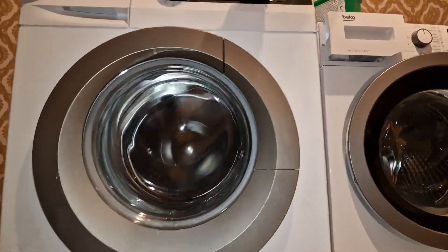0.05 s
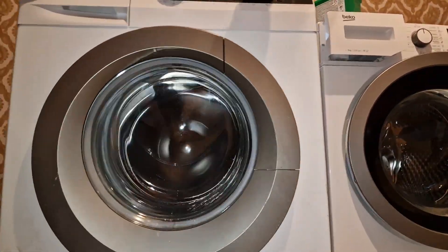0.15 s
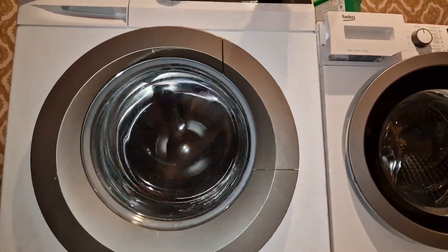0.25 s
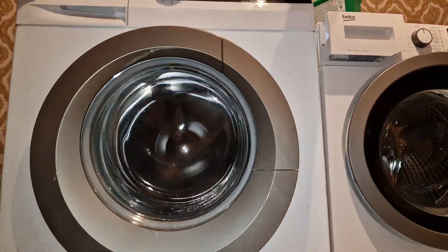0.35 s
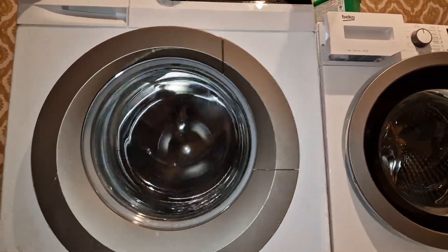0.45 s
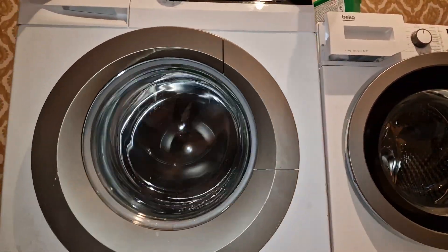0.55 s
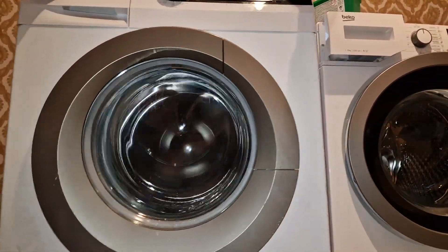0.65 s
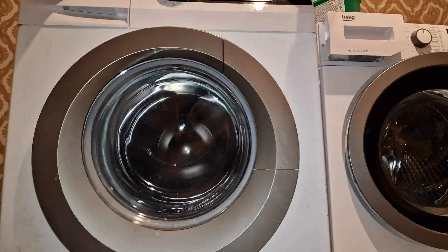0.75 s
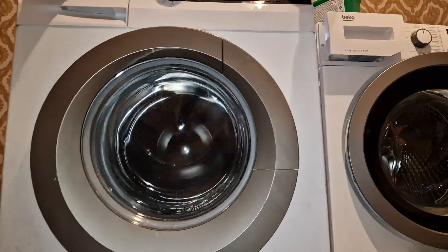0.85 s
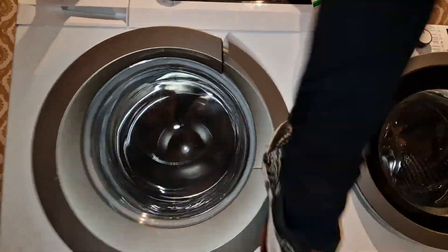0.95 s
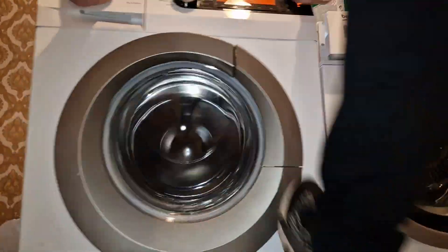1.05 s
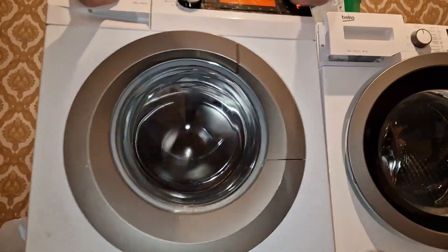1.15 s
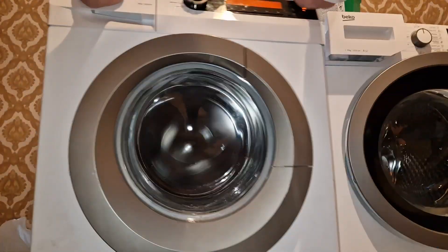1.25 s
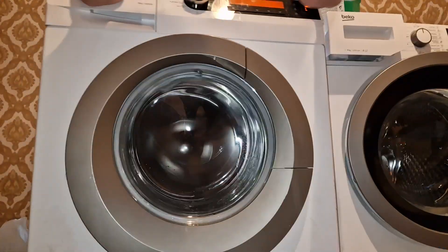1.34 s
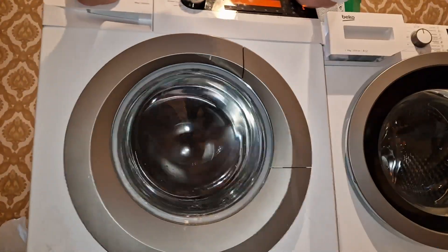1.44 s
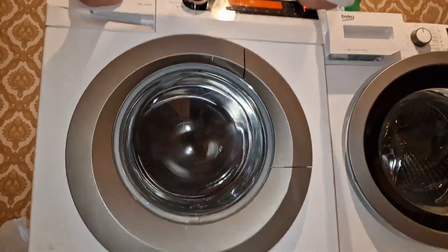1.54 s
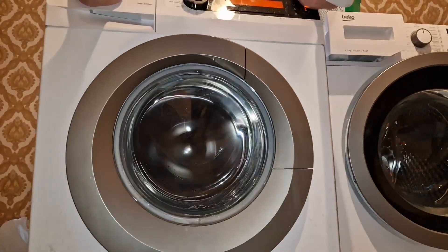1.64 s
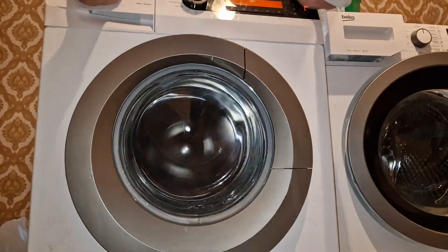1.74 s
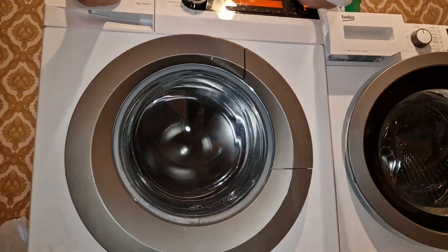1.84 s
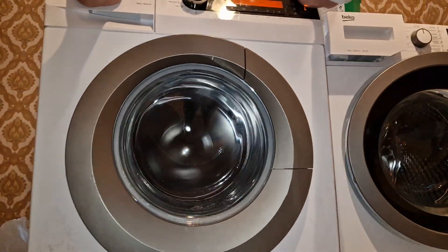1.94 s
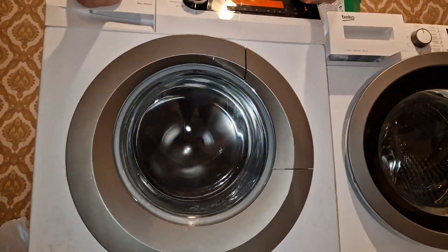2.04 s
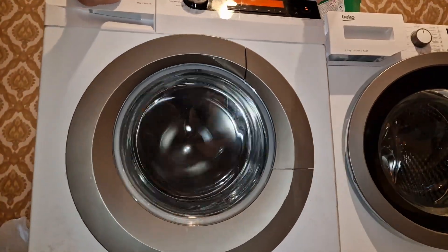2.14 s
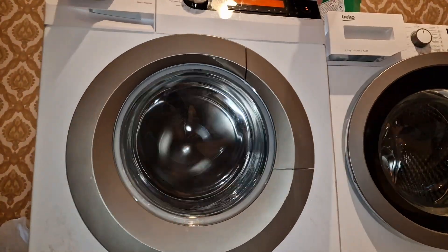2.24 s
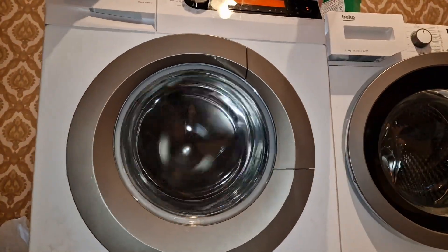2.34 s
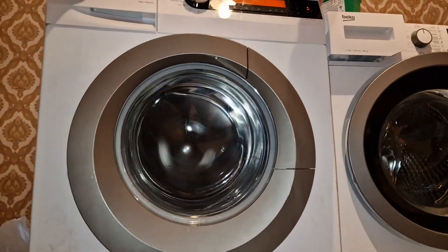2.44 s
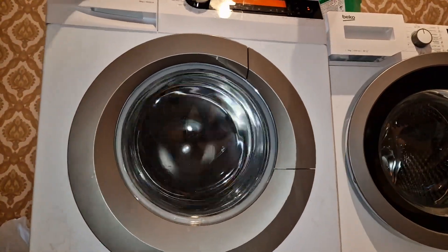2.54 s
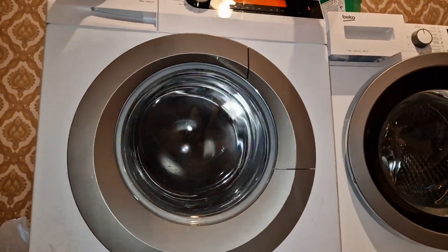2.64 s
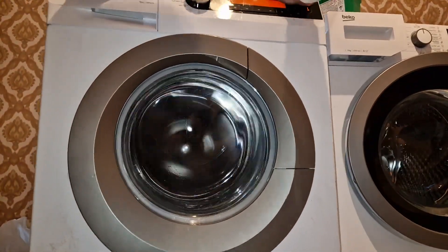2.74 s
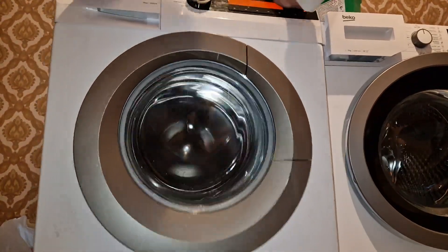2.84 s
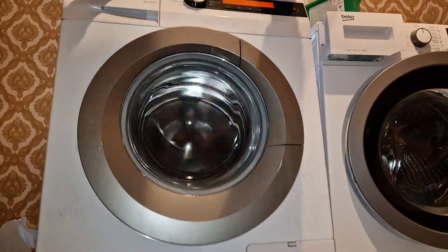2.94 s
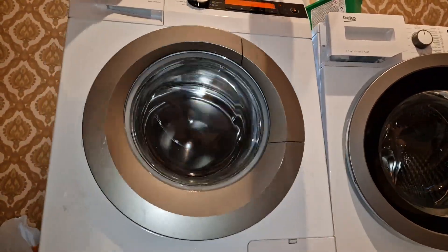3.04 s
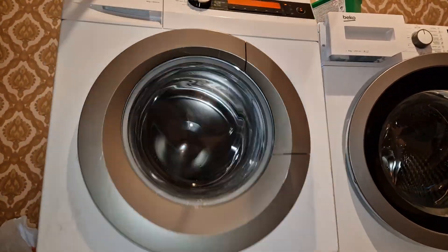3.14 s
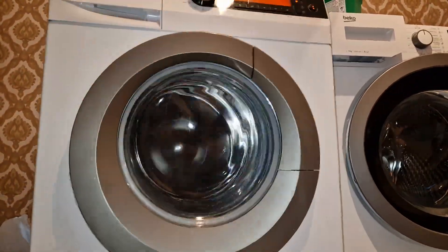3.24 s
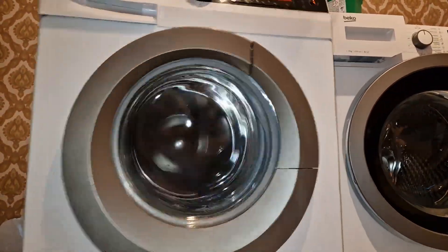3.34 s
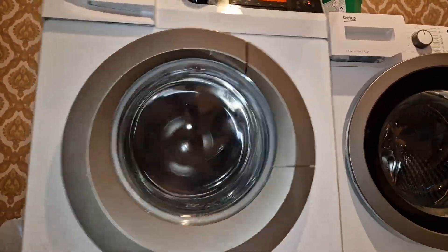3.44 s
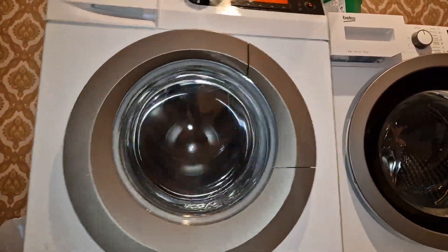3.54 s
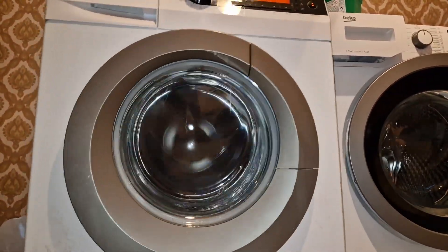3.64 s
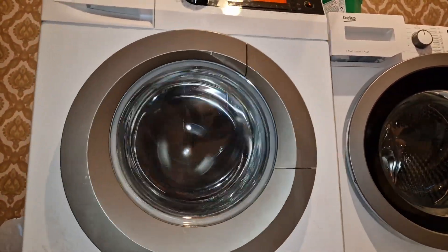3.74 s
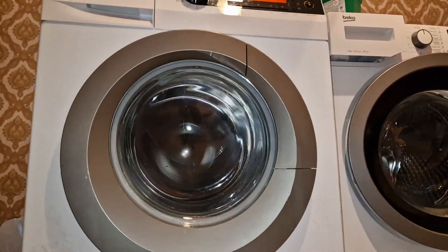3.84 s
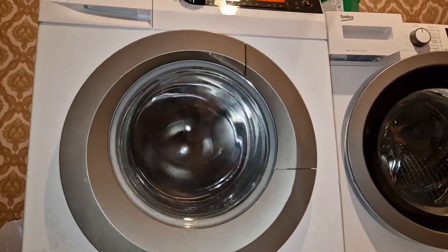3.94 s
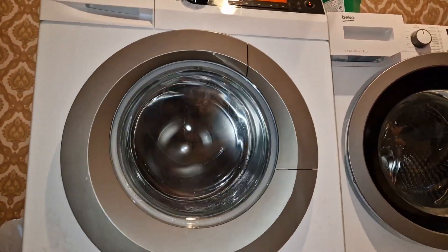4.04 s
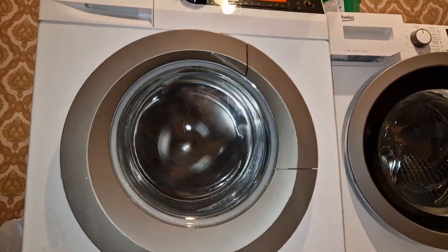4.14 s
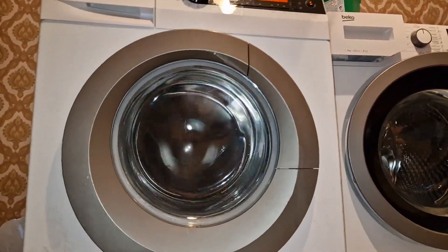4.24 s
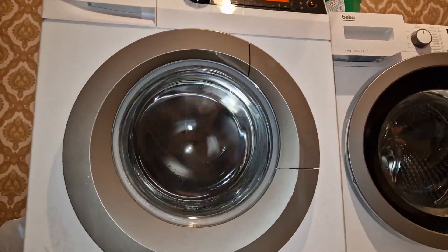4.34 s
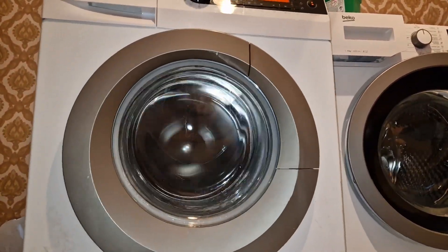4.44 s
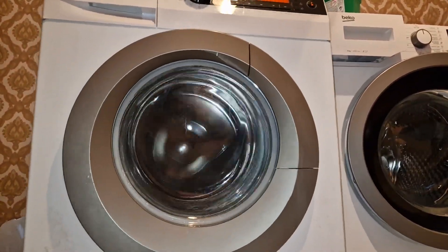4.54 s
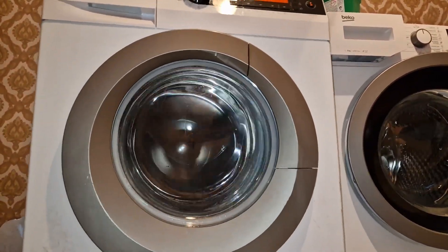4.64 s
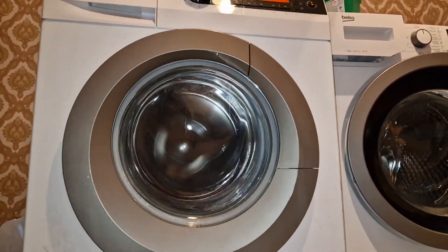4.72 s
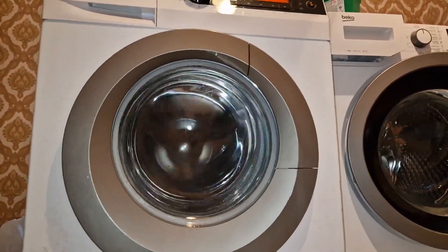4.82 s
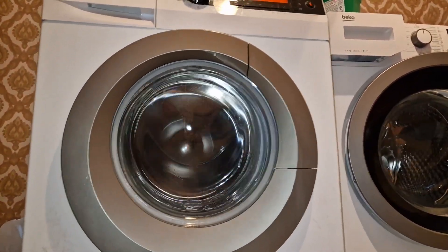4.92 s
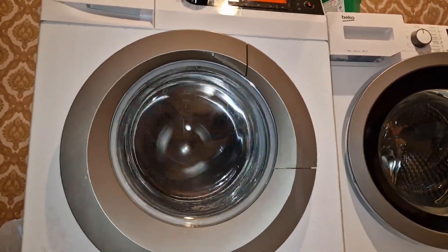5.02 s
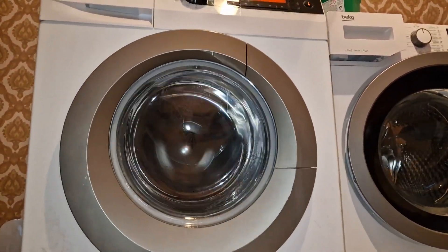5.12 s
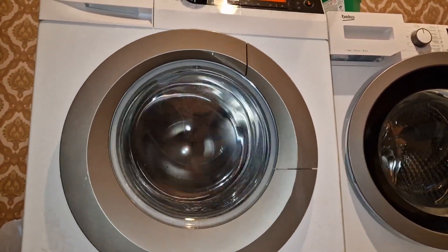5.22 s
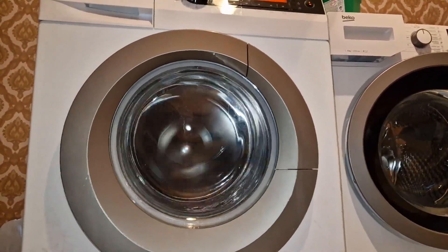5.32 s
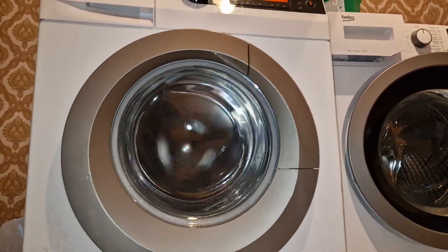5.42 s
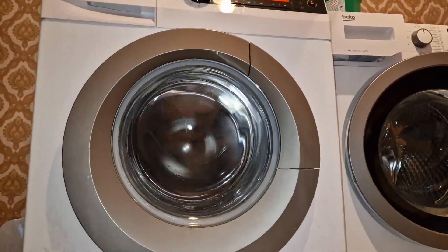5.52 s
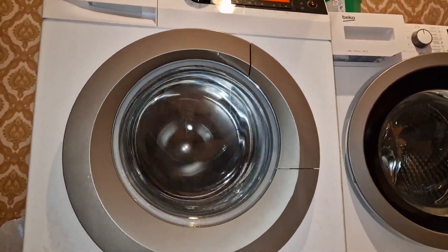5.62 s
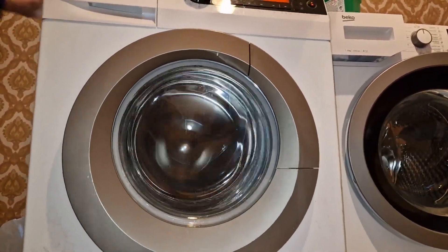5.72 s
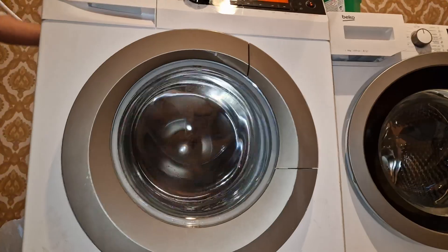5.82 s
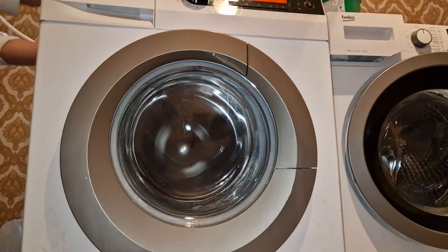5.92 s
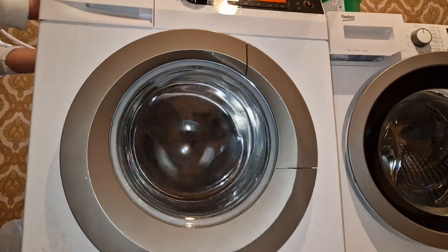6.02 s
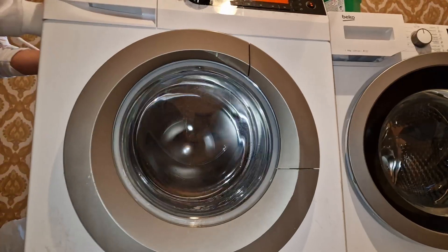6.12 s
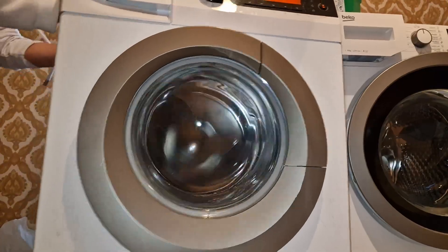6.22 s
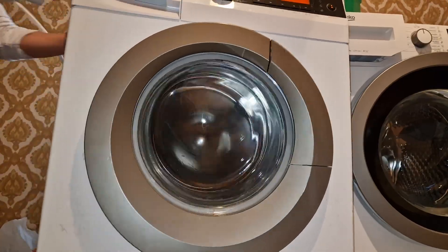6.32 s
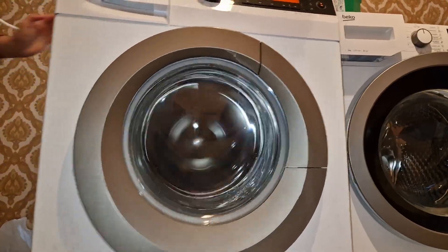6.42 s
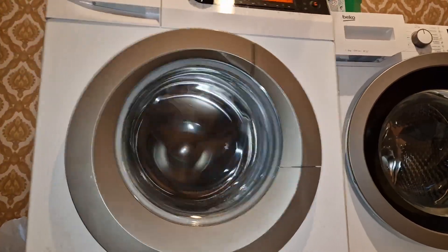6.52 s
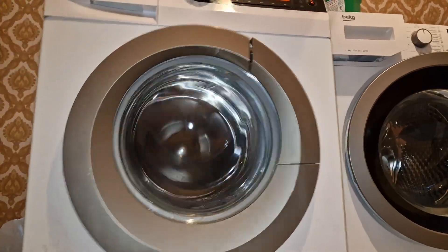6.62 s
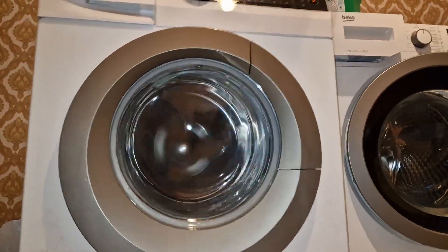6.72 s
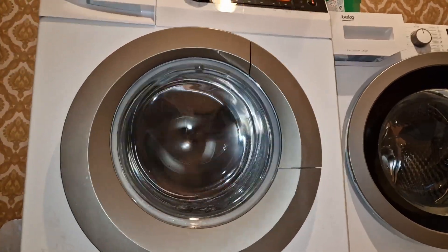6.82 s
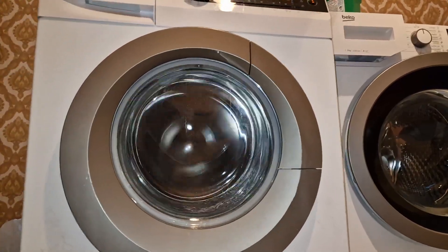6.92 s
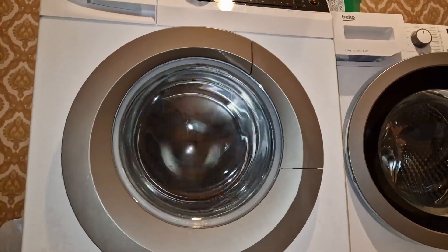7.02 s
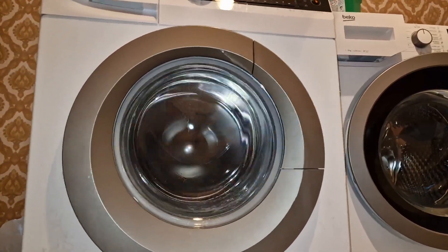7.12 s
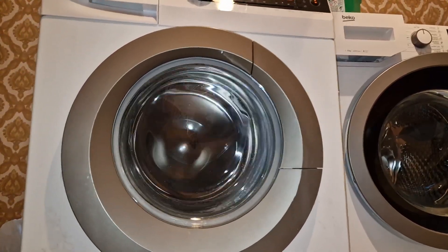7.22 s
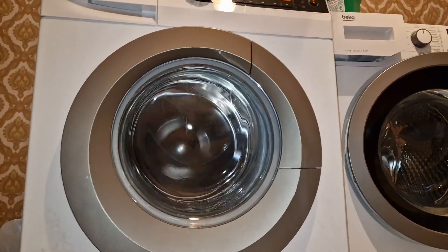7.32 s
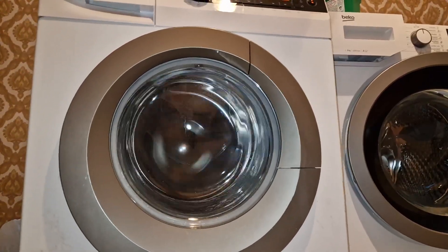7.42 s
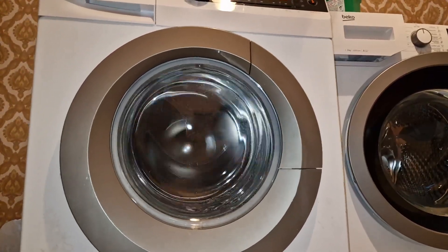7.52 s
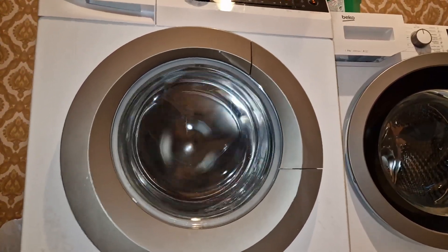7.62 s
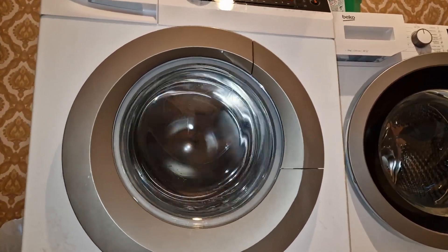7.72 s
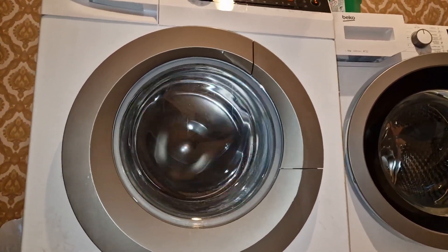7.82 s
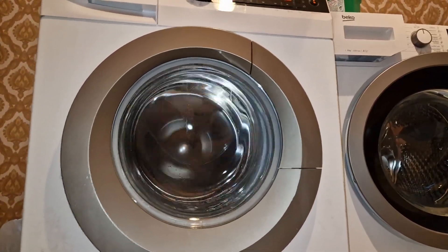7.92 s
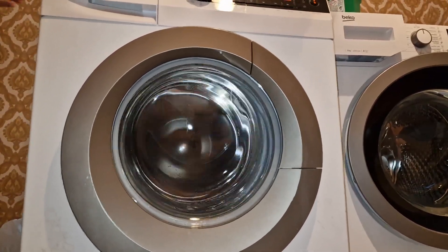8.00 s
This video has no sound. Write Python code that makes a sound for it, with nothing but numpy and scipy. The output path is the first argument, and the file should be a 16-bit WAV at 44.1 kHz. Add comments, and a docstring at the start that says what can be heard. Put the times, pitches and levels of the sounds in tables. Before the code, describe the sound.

A washing machine spins an unbalanced load fast, its heavy low drone throbbing and ticking, broken by three violent volleys of metallic bangs.

```python
"""A front-loading washing machine, nearer the left microphone in a small hard-walled room, spins an unbalanced
load. At ten to twelve turns a second, periodic jolts and irregular rocking drive cabinet modes into a heavy
drone. Shaped noise makes the churning tub, hissing bearing, chafing seal, ticking fittings and light metal
clinks. As the imbalance builds up, the machine lurches three times: it sways, bangs in volleys and judders on
its feet. Blows are noise bursts with ringing panels; each lurch resettles the load."""
import sys
import numpy as np
from scipy import signal
from scipy.fft import rfft, irfft, next_fast_len
from scipy.io import wavfile
from scipy.ndimage import uniform_filter1d, map_coordinates

SR = 44100
rng = np.random.default_rng(int(sys.argv[2]) if len(sys.argv) > 2 else 0)


def store_wav(level_fs):
    """Save 16-bit WAV to argv[1]."""
    pcm = np.round(np.clip(np.atleast_2d(level_fs), -1, 1) * 32767)
    wavfile.write(sys.argv[1], SR, pcm.T.astype(np.int16))


N = 355446
TIME = np.arange(N) / SR


def amp(db):
    """Convert decibels to gain."""
    return np.exp(np.asarray(db) * (np.log(10) / 20))


def unit(x):
    """Scale to rms 1."""
    return x / np.sqrt(np.mean(x ** 2) + 1e-20)


def along(points, hz):
    """Read (frequency [Hz], value) points on a logarithmic frequency axis."""
    frequency, value = np.transpose(points)
    return np.interp(np.log(hz + 1), np.log(frequency + 1), value)


def curves(rows):
    """Give one value per sample for each column after the time."""
    s, *columns = np.transpose(rows)
    return [np.interp(TIME, s, column) for column in columns]


def wobble(rate):
    """A smooth random curve with rate knots a second."""
    return map_coordinates(rng.standard_normal(4096), [TIME * rate], mode="wrap")


def filtered(x, response):
    """Multiply the spectrum of x by a complex response of frequency."""
    m = next_fast_len(N + SR // 2, True)
    return irfft(rfft(x, m) * response(np.fft.rfftfreq(m, 1 / SR)), m)[..., :N]


# likeness of the two microphones: (frequency [Hz], correlation [-1 to 1])
MICROPHONE_LIKENESS = [(60, .99), (130, 0.99), (290, 0.93), (640, 0.89), (1400, 0.45), (3100, 0.083),
                       (12000, 0.016)]
LEFT_LEADS_S = .00018  # the machine stands nearer the left microphone


def spread(pair, gain=lambda hz: 1):
    """Two unrelated signals, coloured by gain, become left and right: alike in the bass, the left a little early."""
    m = next_fast_len(N + 8192, True)
    hz = np.fft.rfftfreq(m, 1 / SR)
    alike = np.clip(along(MICROPHONE_LIKENESS, hz), -1, 1)
    shares = np.sqrt([(1 + alike) / 2, (1 - alike) / 2])
    mid, side = rfft(pair, m) * (gain(hz) * shares)
    late = np.exp(-2j * np.pi * hz * LEFT_LEADS_S)
    return irfft(np.array([mid + side, (mid - side) * late]), m)[:, :N]


def noise(spectrum):
    """Stereo noise of rms 1 with the given colour."""
    white = rng.standard_normal((2, N))
    return unit(spread(white, lambda hz: amp(along(spectrum, hz))))


def blows(times, db):
    """One impulse for each contact."""
    samples = np.clip(np.asarray(times) * SR, 0, N).astype(int)
    return np.bincount(samples, amp(db), N + 1)[:N]


def bursts(times, db, attack, t60):
    """Envelope of contacts that rise over attack seconds and fall 60 dB in t60 seconds."""
    t = TIME[:SR // 2]
    shape = (1 - np.exp(-t / attack)) * amp(-60 * t / t60)
    return signal.oaconvolve(blows(times, db), shape)[:N]


# decay of the small room: (frequency [Hz], t60 [s])
ROOM_DECAY = [(200, 0.71), (1000, 0.22), (4000, 0.29), (9000, 0.26), (16000, 0.29)]


def in_room(x, wet_db):
    """The sound plus the tail of a small hard-walled room, drawn afresh for successive stretches."""
    count = 9  # stretches, each with its own random tail
    grains = rng.standard_normal((count, 2, SR // 2))
    hz, t, z = signal.stft(grains, SR, nperseg=256)
    decay = amp(-60 * t / along(ROOM_DECAY, hz)[:, None]) * (1 - np.exp(-t / 0.00093))
    tails = signal.istft(z * decay, SR, nperseg=256)[1]
    echo = np.zeros((2, N + SR))
    for part, tail in zip(np.array_split(np.arange(N), count), tails):
        answer = signal.fftconvolve(x[:, part], tail / np.linalg.norm(tail[0]), axes=1)
        echo[:, part[0]:part[0] + answer.shape[1]] += answer
    return x + amp(wet_db) * spread(echo[:, :N])


# speed of the drum: (time [s], speed [turns/s])
DRUM_SPEED = [(0, 10.03), (1.4, 9.96), (2.4, 10.39), (3, 10.62), (3.6, 10.41), (4.2, 10.97), (4.8, 10.79),
              (5.6, 11.16), (6.4, 11.31), (7.2, 11.43), (8.06, 11.74)]


def drum_turns():
    """The drum's angle, counted in turns, is its speed summed over time."""
    return .25 + np.cumsum(curves(DRUM_SPEED)[0]) / SR


# growth of the imbalance, before its cap and smoothing: (start time [s], imbalance [dB], growth [dB/s])
LOAD_BUILDUPS = [(0, -4, 1.5), (1.7, -4, 4.5), (3.8, -2, 4), (6.87, -1.84, 4)]
MOST_IMBALANCE_DB, RESETTLE_S = 4.5, 0.21


def imbalance():
    """How far off centre the load sits, in dB: it creeps up to a limit and drops back after each lurch."""
    db = np.zeros(N)
    for start, first_db, growth in LOAD_BUILDUPS:
        db = np.where(TIME >= start, first_db + growth * (TIME - start), db)
    return uniform_filter1d(np.minimum(db, MOST_IMBALANCE_DB), size=int(RESETTLE_S * SR))


DRONE_DB, DRONE_GROWS = -21.5, 0.65  # level at 0 dB of imbalance, and dB gained per dB of it
# the machine nods on its springs at first: rate, time of a crest, depth, time to fade
NOD_HZ, NOD_CREST_S, NOD_DB, NOD_FADE_S = 2.65, 0.057, 4, 0.83
KICK_DB, KICK_T60_S = -6.5, 0.34  # a blow sets the drone swelling, level against its boom


def shaking(imbalance_db, lurch, hits):
    """Level of the drone in dB: the imbalance and the nodding set it, lurches and blows add to it."""
    s, _, _, boom_db = hits
    nod_db = NOD_DB * np.exp(-TIME / NOD_FADE_S) * np.cos(2 * np.pi * NOD_HZ * (TIME - NOD_CREST_S))
    steady = amp(DRONE_DB + DRONE_GROWS * imbalance_db + nod_db)
    kicks = bursts(s, boom_db + KICK_DB, attack=0.028, t60=KICK_T60_S)
    return 10 * np.log10(steady ** 2 + lurch ** 2 + kicks ** 2)


# low modes of the cabinet and tub: (frequency [Hz], width [Hz], relative level [dB])
CABINET_MODES = [(59.3, 16.2, -2.5), (67.85, 11.3, 1), (76.8, 11, -1), (109.2, 15.9, 1),
                 (129.76, 16.4, 2.5), (160.5, 25.3, -7), (245, 18.3, -14), (266.5, 23.7, -8),
                 (398, 127, -19.5)]


def cabinet(force):
    """A force passes the low modes twice, in the tub and in the shell, which leaves hollows between them."""
    def mode(f, centre, width):
        damping = 1j * f * width
        return damping / (centre * centre - f * f + damping)

    def modes(f):
        return sum(amp(db) * mode(f, centre, width) ** 2 for centre, width, db in CABINET_MODES)
    return filtered(force, modes)


# the deepest modes swell as the heavy side swings down: upper edge, place in the turn 0-1, depth
THROB_HZ, THROB_PLACE, THROB_DB = 89, 0.48, 1.5


def drone(turns, level_db, loose):
    """The same jolts come round each turn, mixed with irregular rocking; the cabinet booms with both."""
    orders = np.arange(2, 42)  # harmonics of one turn
    angle = np.linspace(0, 1, 2048)
    phases = rng.random((len(orders), 1))
    one_turn = np.cos(2 * np.pi * (orders[:, None] * angle + phases)).sum(0)
    regular = unit(cabinet(np.interp(turns % 1, angle, one_turn)))
    # colour of the rocking: (frequency [Hz], relative level [dB])
    rough = [(20, 21), (38, -13), (58, -0.5), (280, 1.5), (330, -3.5), (430, -3.0), (900, 3), (3000, -32)]
    rocking = unit(cabinet(noise(rough)))
    boom = np.sqrt(1 - loose) * regular + np.sqrt(loose) * rocking
    # even out the loudness of the drone so that it stays steady
    power = uniform_filter1d(uniform_filter1d(np.mean(boom ** 2, axis=0), size=2600), size=1300)
    boom = boom / np.sqrt(np.abs(power) + 1e-6)
    deep = filtered(boom, lambda hz: 1 / (1 + (hz / THROB_HZ) ** 12))
    throb = unit(amp(THROB_DB * np.cos(2 * np.pi * (turns - THROB_PLACE))))
    return amp(level_db) * (boom - deep + throb * deep)


def each_turn(turns, places, level_db):
    """Times and levels of contacts that recur at fixed places in the turn, never quite alike."""
    place, db = np.transpose(places)
    due = (np.arange(int(turns[-1]) + 1)[:, None] + place).ravel()
    late, stray_db = (rng.standard_normal((len(due), 2)) * [.002, 2.4]).T
    times = np.interp(due, turns, TIME, right=2 * TIME[-1]) + late
    levels = np.interp(times, TIME, level_db) + np.resize(db, len(due)) + stray_db
    return times, levels


# knocks of the dampers: (place in the turn [0-1], relative level [dB])
DAMPER_KNOCKS = [(.16, -8), (.23, -3.5), (.35, -6), (0.731, 0)]
# colour of the churning tub: (frequency [Hz], relative level [dB per Hz])
CHURN_COLOUR = [(150, -32), (300, -1), (410, 0), (600, -3), (800, -4), (1000, -7.5), (1300, -6.5),
                (1800, -13), (2500, -23), (5000, -31.5), (10000, -44), (16000, -38)]


def churn(turns, level_db):
    """The tub's rough rumble swells, and the dampers knock, as the heavy side swings past."""
    swing_db = 2.8 * np.cos(2 * np.pi * (turns - .26))
    rumble = amp(level_db + 2.5) * unit(amp(swing_db + 1.2 * wobble(170)))
    knocks = bursts(*each_turn(turns, DAMPER_KNOCKS, level_db + 10.5), attack=.0012, t60=.06)
    return np.hypot(rumble, knocks) * noise(CHURN_COLOUR) * amp(-0.98)


# colour of the bearing hiss: (frequency [Hz], relative level [dB per Hz])
HISS_COLOUR = [(1200, 4.5), (2500, -0.5), (5000, -5.5), (7500, -8), (10300, -14), (12500, -7.5),
               (16000, -20)]


def swish(turns, level_db):
    """The drum's bearing hisses, louder over part of each turn."""
    hiss_db = 2.4 * np.cos(2 * np.pi * (turns - .03)) + 2.1 * wobble(30)
    return amp(level_db + hiss_db - 4.5) * noise(HISS_COLOUR)


# loose fittings that tick once a turn: (place in the turn [0-1], relative level [dB])
LOOSE_FITTINGS = [(0.022, 5.5), (.18, -18), (.39, -28.5), (.72, 4.5), (0.899, 1)]
# colour of a tick: (frequency [Hz], relative level [dB per Hz])
TICK_COLOUR = [(500, -24), (1500, 8.5), (3000, -0.5), (5500, -2.5), (7500, -3.5), (10000, -8.5),
               (12500, -12), (16000, -25.5)]


def ticks(turns, level_db):
    """Each loose fitting is thrown against its seat at its own place in the turn."""
    due = each_turn(turns, LOOSE_FITTINGS, level_db + 1.5)
    return bursts(*due, attack=0.00074, t60=0.023) * noise(TICK_COLOUR)


# hard blows on the cabinet: (time [s], relative strength [dB], hardness as crack over strength [dB])
HARD_BLOWS = [(0.0517, -31, 10), (0.0756, -18, -1), (0.9657, -29.5, 6.5), (1.0084, -11, 4.5),
              (1.1394, -22.5, -4), (1.2321, -14, 1), (1.2656, -23.5, 0), (1.3076, -25, 3),
              (1.3316, -22.5, -5), (1.3994, -33, -5), (1.4547, -24.5, 4), (1.4714, -23, 6),
              (1.5862, -24, -2), (1.6012, -21, -7), (1.6532, -26, -20), (1.8579, -28.5, 1.5),
              (3.014, -21, -11), (3.0313, -21, -3.5), (3.2056, -23, -4), (3.3814, -14.5, 6.5),
              (3.387, -10, 0), (3.4103, -11.5, 1.5), (3.455, -9.5, -0.5), (3.4772, -14.5, 4),
              (3.58, -22.5, 5.5), (3.6073, -26, 10), (3.7128, -33, 1), (3.785, -36, 9), (6.2303, -20, 1.5),
              (6.3903, -9, -13.5), (6.5116, -16, -0.5), (6.5786, -13.5, 3), (6.6033, -9, 0.5),
              (6.666, -13.5, 5), (6.6902, -13.5, 9), (6.7362, -11.5, 8.5)]
# the tub bottoms out once in each lurch: (time [s], relative boom level [dB])
TUB_THUDS = [(1.002, -5.5), (3.386, -14.5), (6.58, -10.5)]
THUD_CRACK_DB, THUD_CLANK_DB = -20, -7  # against its boom
# relative boom of a blow of usual strength, and its dB per dB of strength
BOOM_DB, BOOM_GROWS, USUAL_BLOW_DB = -23.5, 0.45, -20
# lighter knocks within a lurch
KNOCKS_PER_S, KNOCK_DB, KNOCK_SCATTER_DB, KNOCK_HARDNESS_DB = 7, -27, 3, 0


def contacts():
    """Hard blows, thuds and the lighter knocks of each lurch: times and levels of crack, clank and boom."""
    count = int(KNOCKS_PER_S * N / SR)
    chance = rng.random((256, 2))[:count]
    times = (np.arange(count) + chance[:, 0]) / KNOCKS_PER_S
    within = np.any([(times > start + rise) & (times < end) for start, rise, end, _ in MACHINE_LURCHES], axis=0)
    strength_db = KNOCK_DB + KNOCK_SCATTER_DB * (2 * chance[:, 1] - 1)
    knocks = np.c_[times, strength_db, np.full(count, KNOCK_HARDNESS_DB)]
    rows = []
    for s, db, hardness_db in [*HARD_BLOWS, *knocks[within]]:
        boom_db = BOOM_DB + BOOM_GROWS * (db - USUAL_BLOW_DB)
        rows.append((s, db + hardness_db, db, boom_db))
    rows += [(s, db + THUD_CRACK_DB, db + THUD_CLANK_DB, db) for s, db in TUB_THUDS]
    return np.transpose(rows)


def strikes(times, db, spectrum, t60, tint_db):
    """Short noisy contacts scaled by level; each lands on another spot and so has its own colour."""
    size = SR // 8
    t, hz = TIME[:size], np.fft.rfftfreq(size, 1 / SR)
    knots = np.geomspace(100, 16000, 26)  # Hz
    out = np.zeros((2, N + size))
    for s, level in zip(times, db):
        tint = along(np.c_[knots, tint_db * rng.standard_normal(len(knots))], hz)
        grains = rfft(rng.standard_normal((2, size)))
        hit = irfft(grains * amp(along(spectrum, hz) + tint), size)
        hit = hit * (1 - np.exp(-t / 0.00035)) * amp(-60 * t / t60)
        out[:, int(s * SR):][:, :size] += amp(level) * unit(hit) * np.sqrt(t60)
    return spread(out[:, :N])


# colour of the crack at the contact: (frequency [Hz], relative level [dB per Hz])
CRACK_COLOUR = [(400, -28), (1500, 6), (2600, -1.5), (4000, -1), (7000, -2), (10000, -7), (14000, -8),
                (16000, -9)]
# colour of the clank of the cabinet: (frequency [Hz], relative level [dB per Hz])
CLANK_COLOUR = [(300, 2.5), (600, -3), (830, 3.5), (1050, -2.5), (1270, 0.5), (1800, -10.5), (3000, -16),
                (8000, -32.5)]
# colour of the boom of the cabinet: (frequency [Hz], relative level [dB per Hz])
BOOM_COLOUR = [(28, -22), (50, -4), (130, -3), (280, -2.5), (330, -4.5), (520, -3.5), (750, -10.5),
               (1300, -27), (3000, -59)]
# modes of the sheet-metal panels: (frequency [Hz], relative level [dB], t60 [s])
PANEL_MODES = [(277, 6, .25), (385, -3, .08), (470, 1, .07), (550, -3, .05), (690, -4, .05), (820, 0, .07),
               (960, -4, .05), (1200, 3, .07), (1340, -1, .05), (1830, -7, .05)]


def bangs(hits):
    """Each blow cracks at the contact, clanks and booms in the cabinet, and rings the panels."""
    s, crack_db, clank_db, boom_db = hits
    crack = strikes(s, crack_db - 7.0, CRACK_COLOUR, t60=0.026, tint_db=-1.5)
    clank = strikes(s, clank_db + 0.5, CLANK_COLOUR, t60=0.044, tint_db=2.5)
    boom = strikes(s, boom_db - 4, BOOM_COLOUR, t60=0.039, tint_db=4.5)
    t = TIME[:SR // 2]
    ring = np.zeros(N)
    for hz, db, t60 in PANEL_MODES:
        drive_db = boom_db if hz < 750 else clank_db
        stray_db = 2 * rng.standard_normal(len(s))
        pushes = blows(s, drive_db + db - 18.5 + stray_db)
        tone = np.sin(2 * np.pi * hz * t) * amp(-60 * t / t60)
        ring += signal.oaconvolve(pushes, tone)[:N]
    return in_room(crack, wet_db=-0.5) + in_room(clank + boom + ring, wet_db=-1.5)


# small bright clinks of metal: (time [s], relative level [dB])
METAL_CLINKS = [(0.2982, -40), (0.3122, -36), (3.0514, -35), (3.0654, -27.5), (4.4912, -34), (7.22, -39)]
# colour of a clink: (frequency [Hz], relative level [dB per Hz])
CLINK_COLOUR = [(5000, -22), (7600, -12), (8400, 2), (10300, -8), (12600, 3), (14300, -2), (16000, -6)]


def clinks():
    """Light touches of metal on metal are brief bursts of bright noise."""
    s, db = np.transpose(METAL_CLINKS)
    return bursts(s, db - 4.5, attack=.0005, t60=0.033) * noise(CLINK_COLOUR)


# the whole machine lurches on its feet: (start time [s], rise [s], end time [s], added drone level [dB])
MACHINE_LURCHES = [(.97, 0.017, 1.6, -22.5), (3.12, 0.13, 3.6, -18), (6.152, 0.46, 6.78, -20)]
LURCH_RELEASE_S = .07


def lurching():
    """Strength of the lurches: each rises, holds and stops short."""
    strength = np.zeros(N)
    for start, rise, end, db in MACHINE_LURCHES:
        onset = np.clip((TIME - start) / rise, 0, 1)
        release = np.clip(1 - (TIME - end) / LURCH_RELEASE_S, 0, 1)
        strength += amp(db) * onset * release
    return strength


LURCH_SWAY_DB = -17  # against the added drone


def sway(lurch):
    """Deep rumble of the whole machine rocking during each lurch."""
    # colour of the rumble: (frequency [Hz], relative level [dB])
    deep = [(15, -30), (31, -22), (41, -9), (47, 11), (65, -27), (150, -80), (400, -120)]
    return amp(LURCH_SWAY_DB) * lurch * noise(deep)


# the feet judder over the floor: (start time [s], end time [s], relative level [dB])
FOOT_SKIDS = [(1.255, 1.358, -34.5), (3.221, 3.627, -31.5), (6.247, 6.672, -34), (6.702, 6.787, -26)]
# colour of the juddering feet: (frequency [Hz], relative level [dB per Hz])
SKID_COLOUR = [(100, -7), (300, -5), (800, -1.5), (1400, -7), (2200, -10), (4000, -20.5), (8000, -23.5),
               (12000, -27.5), (16000, -31)]


def skids():
    """Stick and slip of the feet: a gritty rattle."""
    gate = sum(amp(db) * (TIME > start) * (TIME < end) for start, end, db in FOOT_SKIDS)
    grit = unit(amp(4.8 * wobble(220)))
    return uniform_filter1d(gate, size=500) * grit * noise(SKID_COLOUR) * amp(-0.5)


# colour of the chafing door seal: (frequency [Hz], relative level [dB per Hz])
CHAFE_COLOUR = [(1000, 1.5), (2800, -8), (3700, 0.5), (5000, -7), (7000, -7.5), (9000, -21), (16000, -32)]
# place in the turn 0-1, loudest moment, relative level there, time to fade
CHAFE_PLACE, CHAFE_PEAK_S, CHAFE_DB, CHAFE_FADE_S = 0.906, 2.517, -25.5, 0.26


def chafes(turns):
    """Short bright scuffs of the rubber seal, one a turn, swelling and fading."""
    s = np.interp(np.arange(int(turns[-1])) + CHAFE_PLACE, turns, TIME)
    pressure = np.exp(-((TIME - CHAFE_PEAK_S) / CHAFE_FADE_S) ** 2)
    scuffs = bursts(s, np.full(len(s), CHAFE_DB), attack=0.0018, t60=0.046)
    return pressure * scuffs * noise(CHAFE_COLOUR)


# control levels at 0 dB of imbalance, and the dB that each gains per dB of it
CHURN_DB, CHURN_GROWS = -41, 1
TICK_DB, TICK_GROWS = -44, 1.13
LURCH_CHURN_DB = -27  # control level against the added drone
LOOSE, LURCH_LOOSE = 0.55, 0.34  # share of the shaking that differs from turn to turn; more of it in a lurch


def scene():
    """Everything that the turning drum sets going."""
    turns, imbalance_db, lurch, hits = drum_turns(), imbalance(), lurching(), contacts()
    loose = np.clip(LOOSE + LURCH_LOOSE * lurch / lurch.max(), 0, 1)
    churn_gain = amp(CHURN_DB + CHURN_GROWS * imbalance_db) + amp(LURCH_CHURN_DB) * lurch
    churn_db = 20 * np.log10(churn_gain)
    tick_db = TICK_DB + TICK_GROWS * imbalance_db
    drone_db = shaking(imbalance_db, lurch, hits)
    body = drone(turns, drone_db, loose) + churn(turns, churn_db) + sway(lurch)
    rattle = in_room(ticks(turns, tick_db) + clinks() + skids() + chafes(turns), wet_db=-2.5)
    return body + swish(turns, tick_db) + rattle + bangs(hits)


def record(dry):
    """The recorder rounds the highest peaks and keeps nothing above its band limit."""
    rounded = dry / (1 + np.abs(dry) ** 6) ** (1 / 6)
    return filtered(rounded, lambda hz: hz < 16050)


dry = scene()
out = record(dry)
store_wav(out)
```